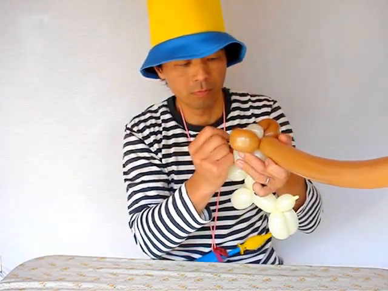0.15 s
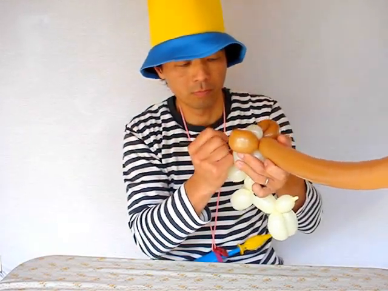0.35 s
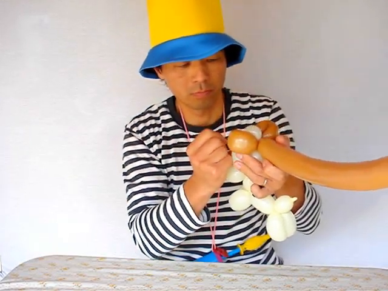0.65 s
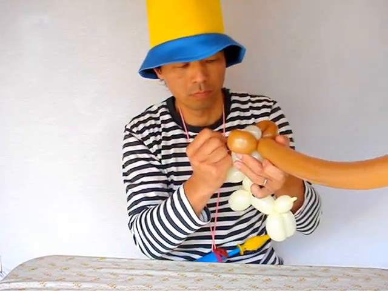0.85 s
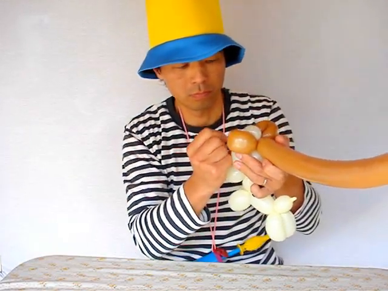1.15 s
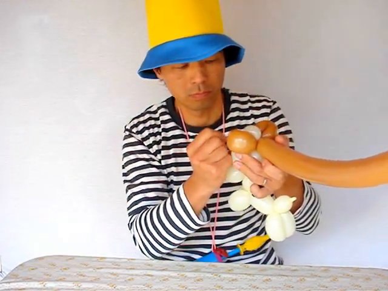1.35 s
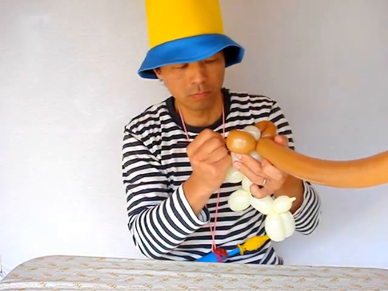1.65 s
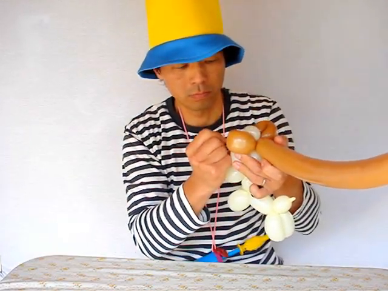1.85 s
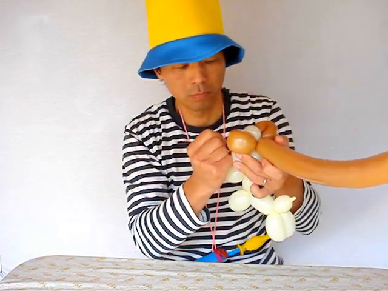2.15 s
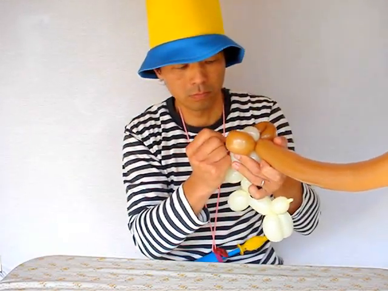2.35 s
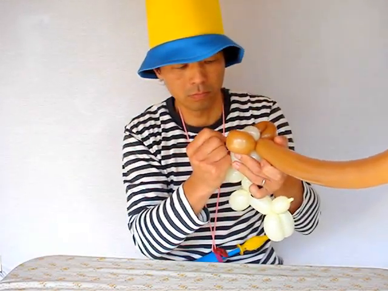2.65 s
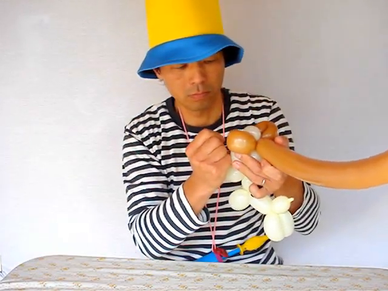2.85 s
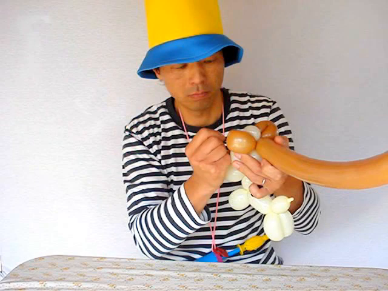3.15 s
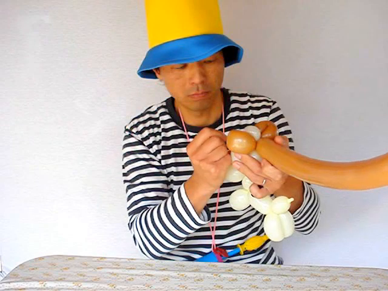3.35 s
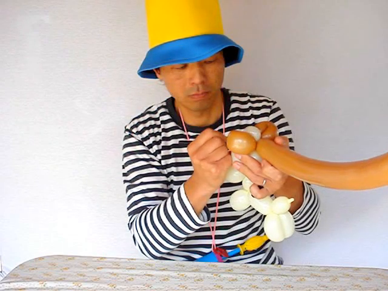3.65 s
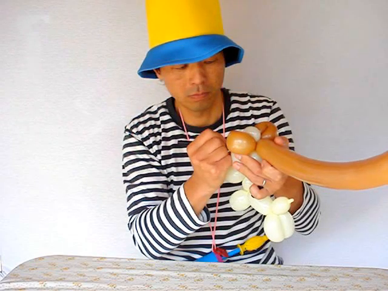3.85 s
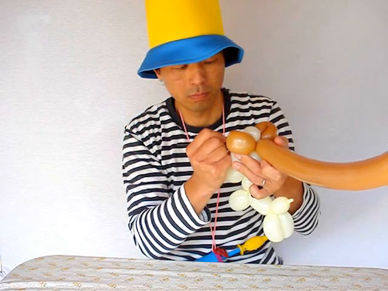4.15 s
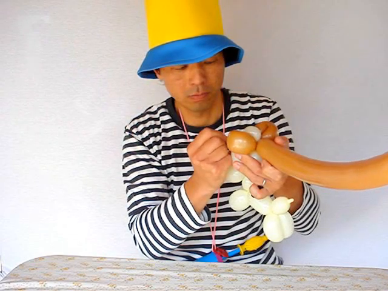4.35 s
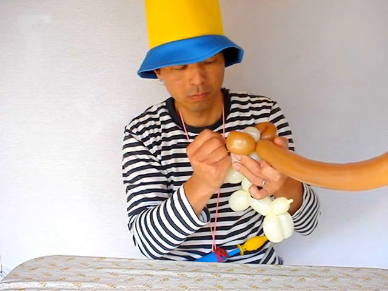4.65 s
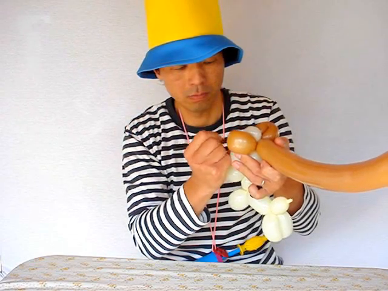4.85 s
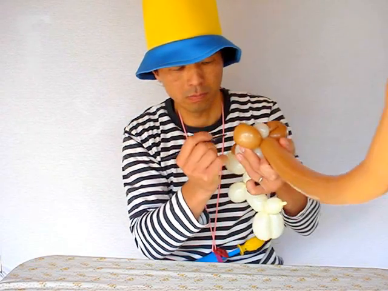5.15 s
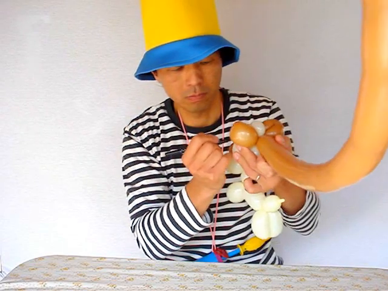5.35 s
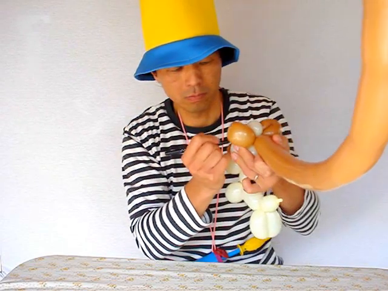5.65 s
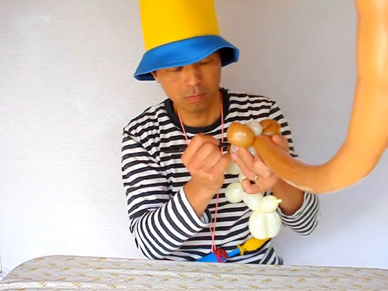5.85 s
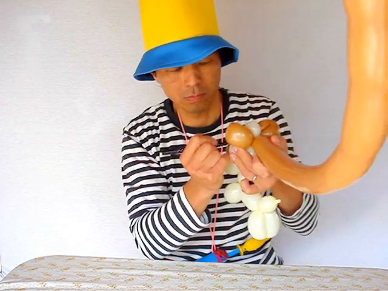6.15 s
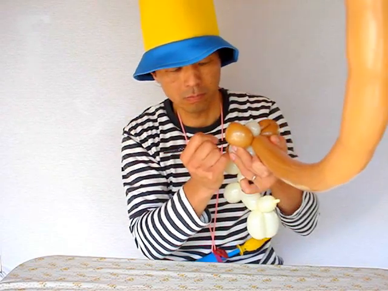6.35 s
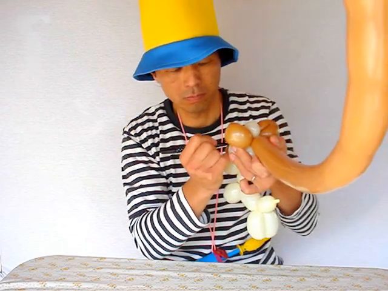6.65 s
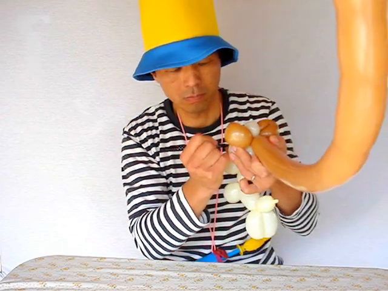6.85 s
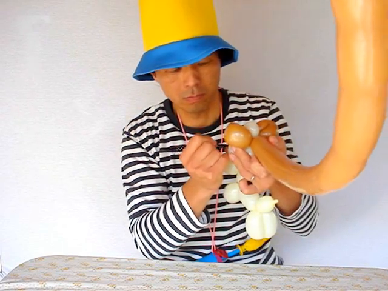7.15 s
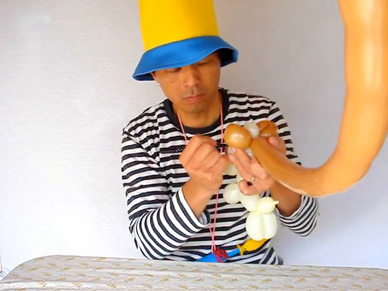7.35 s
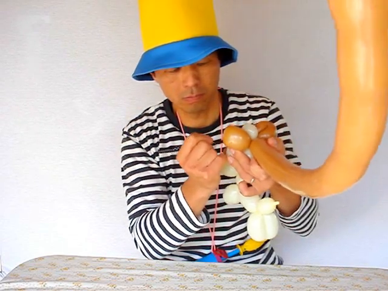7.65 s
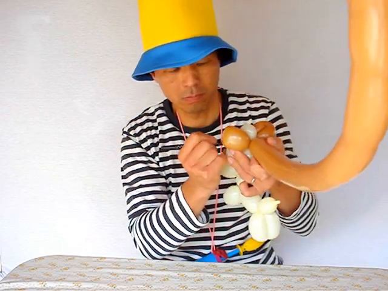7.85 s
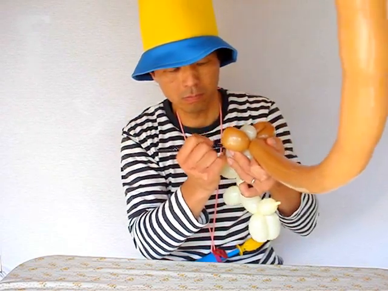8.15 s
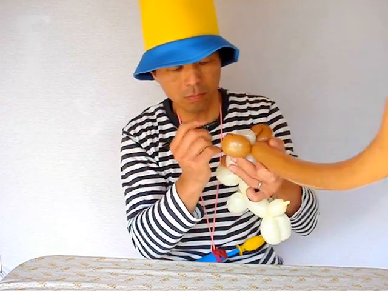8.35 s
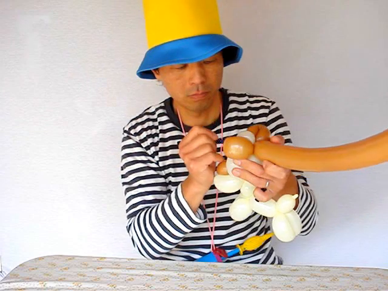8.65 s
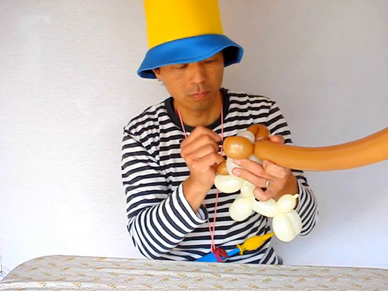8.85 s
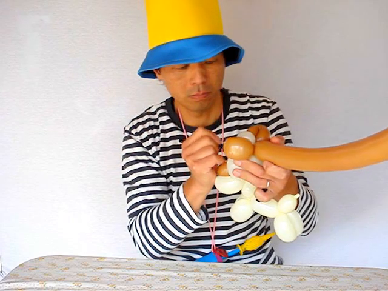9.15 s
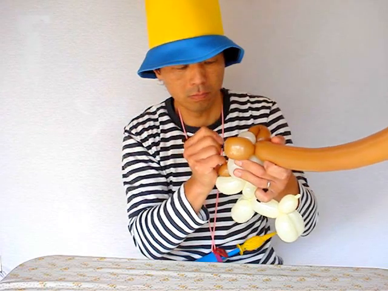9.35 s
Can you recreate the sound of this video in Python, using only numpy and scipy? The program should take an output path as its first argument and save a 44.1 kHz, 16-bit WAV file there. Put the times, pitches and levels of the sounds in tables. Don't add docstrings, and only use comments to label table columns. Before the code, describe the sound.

Dry, close squeaks of a marker on inflated latex, each a fraction of a second long. Some are low, rough and creaky, others jump upward like chirps or brake sharply downward. They come in uneven bunches separated by near silence, busiest just past the middle, then become sparse. A few finger knocks make the balloon ring briefly, with a short small-room response, steady microphone hiss and a very faint high whine.

```python
import sys
import numpy as np
from scipy import signal
from scipy.fft import rfft, irfft
from scipy.io import wavfile
from scipy.ndimage import uniform_filter1d, minimum_filter1d

SR = 44100
rng = np.random.default_rng(int(sys.argv[2]) if len(sys.argv) > 2 else 0)


def volts_from_db(level):
    exponent = np.asarray(level, float) / 20
    return 10 ** exponent


def master_out(mix):
    frames = np.transpose(np.atleast_2d(mix))
    ceiling = np.clip(frames, -1, 1)
    pcm = np.round(ceiling * 32767).astype(np.int16)
    wavfile.write(sys.argv[1], SR, pcm)


N = 419252

# pitch_hz, level_db
RADIATION = [(300, -12.5), (600, -11), (1100, -3.5), (1800, 4.5), (3000, -0.5), (4200, -3.5), (6000, 0),
             (8000, -5), (10500, -14)]
# pitch_hz, width_hz, level_db
BALLOON = [(1130, 19, 9.5), (1500, 21, -53), (1755, 20, -3.5), (1868, 12, 6), (2630, 27, -23),
           (2541, 33, 13), (3120, 330, -0.5), (3940, 34, -30.5)]
# start_s, peak_db, centre_hz
TOUCHES = [
    (2.294, -20.5, 1640),
    (4.882, -34, 1640),
    (4.947, -33, 1060),
    (4.96, -38.5, 479),
    (9.344, -54, 340),
    (9.387, -59, 3350),
    (9.502, -26.5, 505),
]
# start_s, peak_db, centre_hz
THUMP = (2.296, -27.5, 315)
# pitch_hz, level_db (per Hz)
HISS = [(15, -45.5), (25, -18.5), (70, -9.5), (220, -2.5), (400, -3.5), (790, -7), (1470, -10.5),
        (1930, -13), (4000, -18.5), (6700, -21.5), (8300, -24.5), (9800, -22.5), (12700, -42)]
# pitch_hz, level_db
WHINE = [(7410, -88), (7500, -86), (7530, -81), (7560, -73), (7590, -72), (7620, -83), (7650, -88)]
# time_s, level_db
SLIDE = [
    (6.07, -78),
    (6.12, -64),
    (6.17, -61),
    (6.22, -72),
]

# start_s, length_s, level_db, first_slip_hz, last_slip_hz
FLICKS = [
    (2.615, 0.027, -46.5, 2800, 3240),
    (6.448, .055, -32, 2008, 3073),
    (6.863, 0.11, -29.5, 2345, 2978),
    (7.17, 0.051, -38.5, 2880, 3144),
]
PUSHES = [(1.834, .01, -31.5, 940, 947), (1.844, .026, -31.5, 1300, 1816), (2.12, 0.023, -39.5, 1553, 2014),
          (2.458, 0.026, -38.5, 816, 934), (2.48, 0.032, -30.5, 1502, 1953),
          (2.729, 0.025, -33, 1517, 2363), (4.458, .032, -31.5, 1407, 2033),
          (4.622, .03, -31.5, 1402, 2098), (4.731, 0.014, -31, 760, 900), (5.82, 0.021, -35, 1247, 1720),
          (6.418, .028, -32.5, 1384, 1714), (6.638, 0.033, -33, 1865, 2490),
          (6.851, 0.01, -32.5, 1494, 1750), (7.012, .036, -34, 1840, 3070), (7.295, .034, -30.5, 996, 3003),
          (7.401, 0.023, -28, 1252, 2360)]
RUNOUTS = [
    (1.87, .036, -35, 1807, 1233),
    (1.906, .068, -43, 1192, 1470),
    (2.139, 0.013, -44, 1990, 1750),
    (2.512, 0.028, -34.5, 2508, 2575),
    (2.79, .018, -38.5, 1630, 1310),
    (4.494, .02, -43, 2640, 2560),
    (2.657, .044, -39.5, 1850, 1440),
    (5.843, .018, -33, 1005, 1164),
    (6.714, 0.018, -34, 1475, 1443),
    (7.423, .064, -28, 2400, 1299),
]
DABS = [
    (.325, 0.031, -41, 1440, 1446),
    (.352, 0.05, -38, 1372, 1394),
    (7.952, 0.026, -49, 2450, 2370),
    (9.142, .038, -40.5, 1596, 1615),
]
BRAKES = [
    (2.386, .02, -39.5, 1443, 527),
    (4.674, .03, -40, 1488, 493),
    (4.743, 0.049, -29.5, 905, 546),
    (6.666, .049, -33, 2522, 1473),
    (7.216, 0.037, -47, 3100, 1373),
]
SKIDS = [
    (2.293, 0.044, -29.5, 1120, 1700),
    (2.333, 0.013, -28, 1700, 2500),
    (2.757, 0.031, -38.5, 3000, 1630),
    (4.652, 0.023, -40, 2200, 2600),
    (2.346, .04, -35, 1730, 1500),
]
HOLLOW_DABS = [
    (4.572, 0.018, -43.5, 1350, 1430),
    (8.163, 0.051, -38, 1645, 1563),
    (9.398, 0.032, -35.5, 1130, 1090),
    (9.409, 0.04, -34, 1310, 1207),
]
# glide_eagerness_per_s, attack_share, attack_db, hold_share, release_db
MOTION = dict(flick=(75.3, 0.15, 9., 0.28, 22.5), push=(7.76, 0.69, 4.1, 0.87, 4.),
          runout=(8., 0.017, 1, 0.46, 5.2), brake=(-85.5, .05, 0, 0.57, 6),
          skid=(5.9, 0.37, 9.7, 0.77, 3.2), dab=(30., .3, 9.2, 0.49, 24), hollow=(40., 0.31, 12, .4, 17))
# roughness_0_to_1, overtone_fall_db_per_octave, even_overtone_lift_db
GRIP = dict(flick=(0.16, 7.6, 4.4), push=(.25, 4.2, .1), runout=(0.29, 4.4, .1), brake=(0.22, 3.7, .1),
        skid=(0.67, 5.7, .1), dab=(.12, 7.2, 1.3), hollow=(0.34, 3.3, -9))

# time_s, slip_hz, level_db
DRAG_A = [(.716, 641.3, -36), (.76, 548.3, -34.5), (.768, 350, -32.5), (.826, 334.4, -33),
          (.834, 662.4, -31.5), (.89, 617.7, -37), (.898, 384.6, -39), (.965, 385, -33),
          (.997, 318.8, -38.5)]
DRAG_B = [(1.432, 806, -44), (1.442, 724, -39.5), (1.496, 726, -38.5), (1.551, 763, -36), (1.586, 697, -41),
          (1.642, 680, -42), (1.674, 623, -48.5)]
DRAG_C = [(3.498, 560, -40), (3.528, 709, -35.5), (3.557, 573, -35.5), (3.598, 874, -37),
          (3.622, 897, -33.5), (3.634, 730, -35), (3.662, 722, -34.5), (3.702, 778, -39.5),
          (3.765, 737, -46)]
DRAG_D = [(3.964, 539.6, -43), (3.982, 629, -33), (4.014, 699.7, -33), (4.054, 569, -32.5),
          (4.108, 861, -31), (4.135, 441, -31), (4.169, 478.4, -31.5), (4.195, 618.6, -34),
          (4.275, 477.3, -41)]
# roughness_0_to_1, roughness_gain_per_s, overtone_fall_db_per_octave,
# even_overtone_lift_db
DRAG_GRIP = [
    (0.25, 0.56, 5, -1),
    (.12, .6, 5.5, 0.8),
    (.15, .1, 5.5, 2.),
    (0.12, 1.93, 5.5, 2),
]


def squeaks(jitter, flutter_db, patchy_db, scrape_db, edge_s):
    out = np.zeros(N)
    unsteady, grip, patches = wobble(312.0), wobble(47.4), wobble(49.0)
    scrape = coloured(RADIATION)
    scrape_low = signal.sosfilt(signal.butter(2, 3000., fs=SR, output="sos"), scrape)
    scrape_high = scrape - scrape_low
    top_hz = 11000
    for (s, *columns), soft_db, even_db in strokes():
        at = np.arange(int(s[0] * SR), int(s[-1] * SR))
        hz, level_db, rough = [np.interp(at / SR, s, column) for column in columns]

        leap = np.abs(np.gradient(np.log(hz))) * SR
        rough = np.clip(rough + .1 + .015 * np.maximum(leap - 22, 0), 0, .97)

        dull_db = soft_db + 0.42 * (level_db.max() - level_db)
        dull_db = dull_db + 1.9 * np.exp((at[0] - at) / (0.0036 * SR))

        slip_hz = hz * (1 + jitter * rough * unsteady[at] + 0.00648 * grip[at])
        phase = 2 * np.pi * np.cumsum(slip_hz) / SR

        k = np.arange(1, top_hz // hz.min() + 1)[:, None]
        own_db = patchy_db * patches[(at + 9973 * k.astype(int)) % N]
        gains_db = at_hz(RADIATION, k * hz) - dull_db * np.log2(k) + even_db * (k % 2 == 0) + own_db
        gains = volts_from_db(gains_db) * (k * hz < top_hz)
        tone = np.sum(gains * np.sin(k * phase + 0.65 * k ** 2), axis=0)
        tone = tone / np.sqrt(np.sum(gains ** 2, axis=0) / 2)

        grit = scrape_low[at] + volts_from_db(3.0 - 1.6 * dull_db) * scrape_high[at]
        burst = volts_from_db(scrape_db) * grit * (1 + np.cos(phase))

        edges = np.clip(np.minimum(at - at[0], at[-1] - at) / (edge_s * SR), 0, 1)
        force = volts_from_db(level_db + flutter_db * grip[at]) * edges
        out[at] += force * (np.sqrt(1 - rough ** 2) * tone + rough * burst)
    return signal.sosfilt(signal.butter(3, 420., "high", fs=SR, output="sos"), out)


def strokes():
    kinds = dict(flick=FLICKS, push=PUSHES, runout=RUNOUTS, brake=BRAKES, skid=SKIDS,
                 dab=DABS, hollow=HOLLOW_DABS)
    firm_db, softer_per_db = -29.5, .3
    for kind, table in kinds.items():
        rough, soft_db, even_db = GRIP[kind]
        for row in table:
            s, hz, level_db = glide(row, MOTION[kind])
            if kind in ("push", "runout"):
                hz, level_db = lingering(hz, level_db)
            softness_db = soft_db + softer_per_db * (firm_db - row[2])
            yield (s, hz, level_db, rough + 0 * s), softness_db, even_db

    clean_hz, rough_per_octave = 652, 0.498
    for table, (rough, tiring, soft_db, even_db) in zip((DRAG_A, DRAG_B, DRAG_C, DRAG_D), DRAG_GRIP):
        s, hz, level_db = np.transpose(table)
        stutter = rough_per_octave * np.maximum(np.log2(clean_hz / hz), 0) + tiring * (s - s[0])
        yield (s, hz, level_db, rough + stutter), soft_db, even_db


def glide(row, motion):
    s, length, db, first_hz, last_hz = row
    eager, attack, attack_db, hold, release_db = motion
    part = np.linspace(0, 1, num=41)
    way = np.expm1(-eager * length * part) / np.expm1(-eager * length)
    rise_db = attack_db * np.clip(1 - part / attack, 0, 1)
    fall_db = release_db * np.clip((part - hold) / (1 - hold), 0, 1)
    return s + length * part, first_hz * (last_hz / first_hz) ** way, db - rise_db - fall_db


def lingering(hz, level_db):
    lock_hz, step_hz, pull, swell_db = 2009, 350., 0.72, 1.5
    turn = 2 * np.pi * (hz - lock_hz) / step_hz
    drawn_hz = hz - pull * step_hz / (2 * np.pi) * np.sin(turn)
    return drawn_hz, level_db + swell_db * np.cos(turn)


def touches():
    out = np.zeros(N)
    grit = rng.standard_normal((len(TOUCHES) + 1, 600))
    for (s, peak_db, hz), noise in zip([*TOUCHES, THUMP], grit):
        contact = noise * np.exp(-np.arange(len(noise)) / (0.0016 * SR))
        knock = resonance(resonance(contact, hz, 0.94 * hz), hz, 0.94 * hz)
        knock = volts_from_db(peak_db - 2.5) * knock / np.abs(knock).max()
        at = int(s * SR)
        out[at:at + len(knock)] += knock[:N - at]
    return out


def slide():
    s, level_db = np.transpose(SLIDE)
    fibres = rng.standard_normal(N)
    whisper = rms_one(resonance(resonance(fibres, 2700., 1800.), 2700., 1800.))
    return volts_from_db(np.interp(np.arange(N) / SR, s, level_db, left=-120, right=-120)) * whisper


def balloon(x, ring_db):
    modes = np.zeros(N)
    for k, (hz, width_hz, db) in enumerate(BALLOON):
        modes += (-1) ** k * volts_from_db(db) * resonance(x, hz, width_hz)
    return x + volts_from_db(ring_db) * modes


def room(x):
    t = np.arange(int(.4 * SR)) / SR
    fade_60db_s = 0.18
    echoes = rng.standard_normal(len(t)) * volts_from_db(-60 * t / fade_60db_s) * (t > .004)
    echoes = signal.lfilter(*signal.butter(1, 10500, fs=SR), echoes)
    echoes = echoes / np.sqrt(np.sum(echoes ** 2))
    return volts_from_db(-7.5) * signal.fftconvolve(x, echoes)[:N]


def background():
    t = np.arange(N) / SR
    whine = np.zeros(N)
    for hz, db in WHINE:
        whine += volts_from_db(db) * np.sqrt(2) * np.sin(2 * np.pi * (hz * t + rng.random()))
    return volts_from_db(-54) * coloured(HISS) + whine


def rms_one(x):
    return x / np.sqrt(np.mean(x ** 2) + 1e-20)


def at_hz(points, hz):
    points_hz, points_db = np.transpose(points)
    return np.interp(np.log(hz + 1), np.log(points_hz), points_db)


def coloured(points):
    white = rfft(rng.standard_normal(N))
    hz = np.arange(len(white)) * SR / N
    return rms_one(irfft(white * volts_from_db(at_hz(points, hz)), N))


def wobble(rate_hz):
    r = np.exp(-2 * np.pi * rate_hz / SR)
    return rms_one(signal.lfilter([1], [1, -2 * r, r * r], rng.standard_normal(N)))


def resonance(x, hz, width_hz):
    r = np.exp(-np.pi * width_hz / SR)
    feedback = [1, -2 * r * np.cos(2 * np.pi * hz / SR), r * r]
    return signal.lfilter([(1 - r * r) / 2, 0, (r * r - 1) / 2], feedback, x)


def dropouts(x, ahead_s, leap_db, spread_db):
    span, out = int(ahead_s * SR), x.copy()
    level_db = 10 * np.log10(uniform_filter1d(x ** 2, size=256) + 1e-12)
    coming_db = -minimum_filter1d(-level_db, size=span, origin=-(span // 2))
    edges_hz, chance = np.geomspace(1900, 10300, 10), wobble(6.)
    for k, (low, high) in enumerate(zip(edges_hz, edges_hz[1:])):
        band = signal.sosfiltfilt(signal.butter(3, [low, high], "band", fs=SR, output="sos"), x)
        needed_db = leap_db - 1.2 * k + spread_db * np.roll(chance, 30011 * k)
        muted = (coming_db - level_db > needed_db) * 1.
        out -= band * uniform_filter1d(muted, size=128)
    return out


def scene():
    rubbing = squeaks(jitter=.075, flutter_db=.8, patchy_db=3.5, scrape_db=-4.5, edge_s=0.0026)
    near = balloon(rubbing + touches(), ring_db=-5.5)
    return (near + room(near) + background() + slide())[None]


def low_pass(x):
    return signal.sosfilt(signal.butter(12, 10050, fs=SR, output="sos"), x)


def record(dry):
    cut = signal.sosfilt(signal.cheby2(16, 60, 10430, fs=SR, output="sos"), dry[0])
    mix = dropouts(cut, ahead_s=.024, leap_db=26, spread_db=4)[None]
    return low_pass(mix)


dry = scene()
out = record(dry)
master_out(out)
```